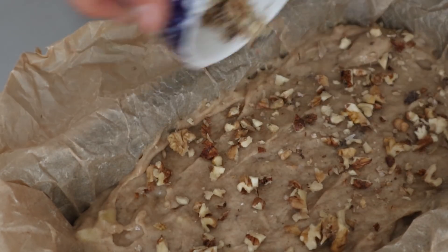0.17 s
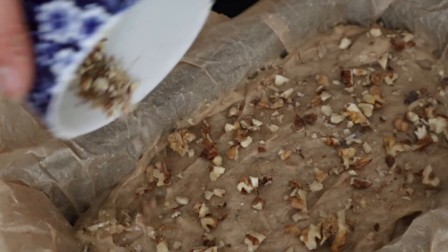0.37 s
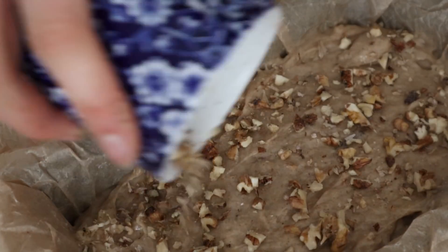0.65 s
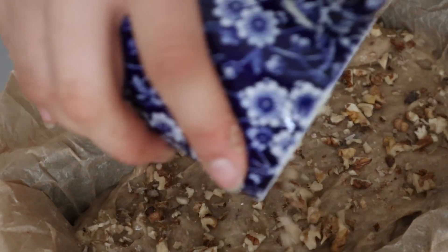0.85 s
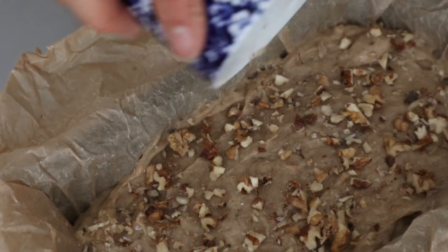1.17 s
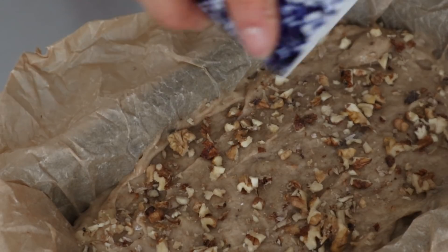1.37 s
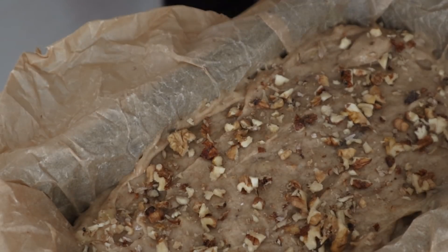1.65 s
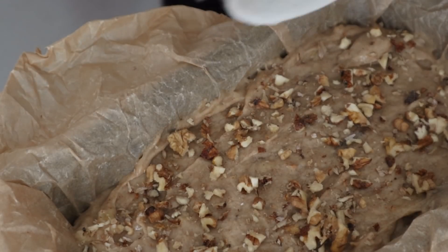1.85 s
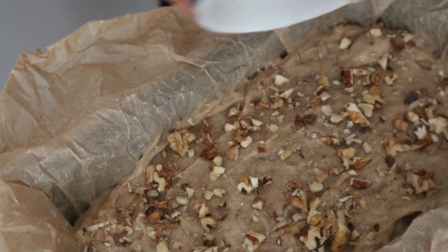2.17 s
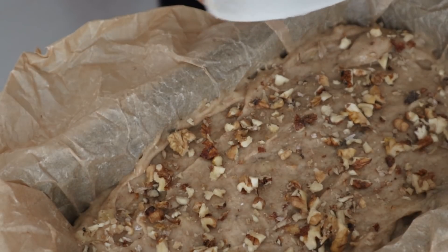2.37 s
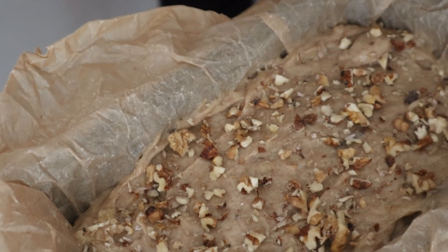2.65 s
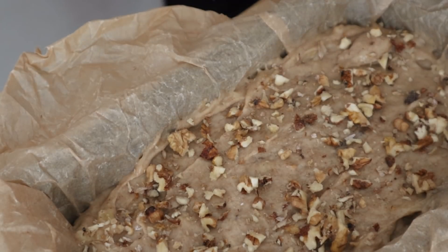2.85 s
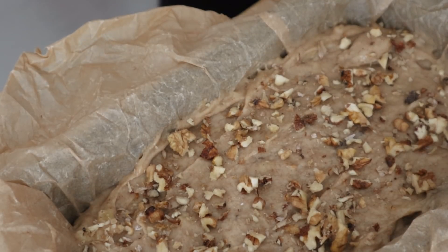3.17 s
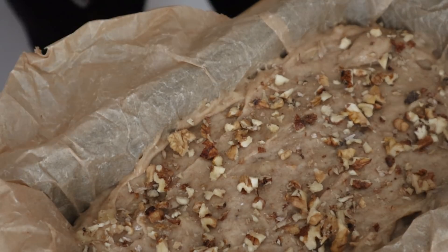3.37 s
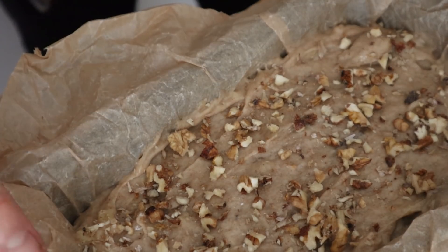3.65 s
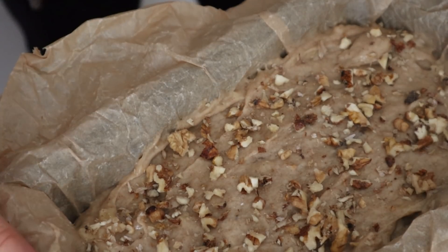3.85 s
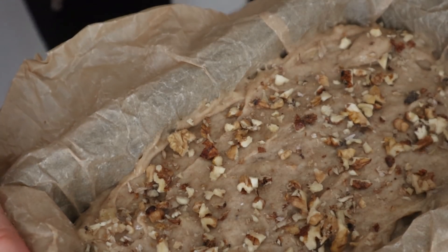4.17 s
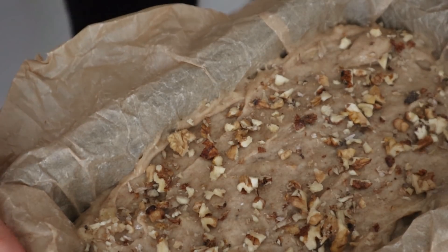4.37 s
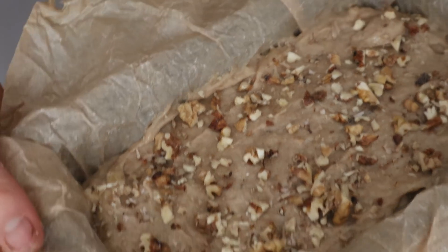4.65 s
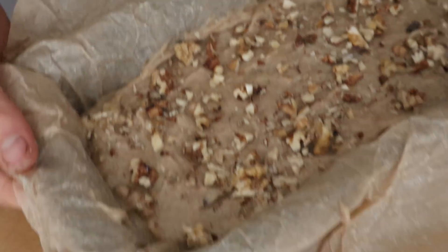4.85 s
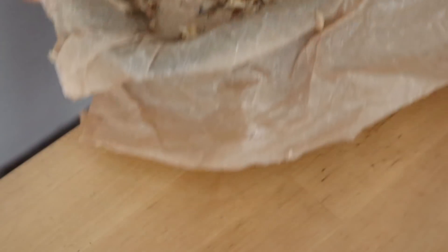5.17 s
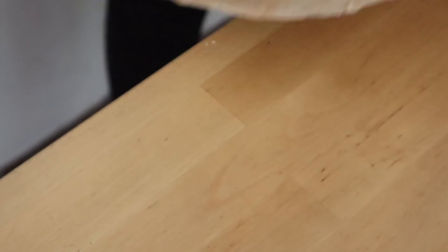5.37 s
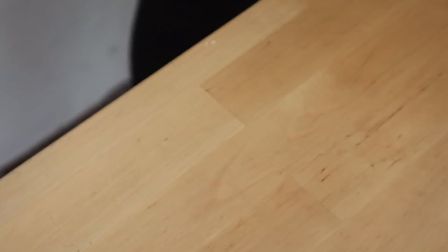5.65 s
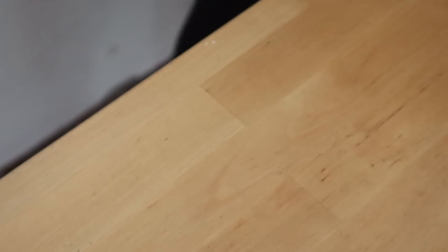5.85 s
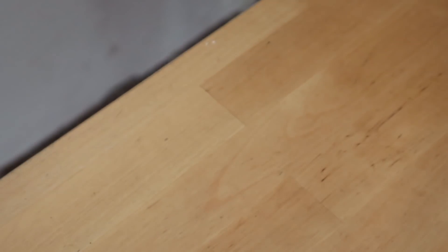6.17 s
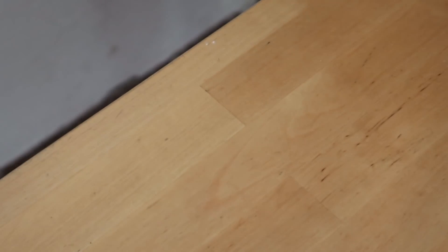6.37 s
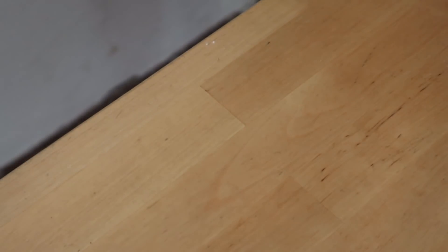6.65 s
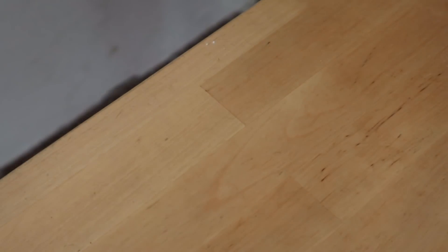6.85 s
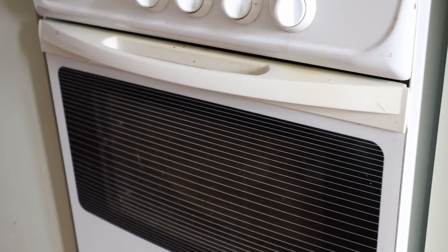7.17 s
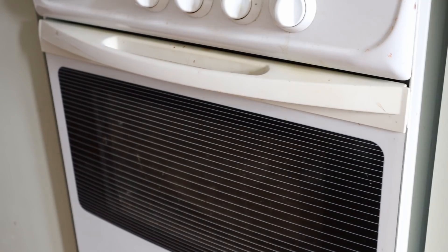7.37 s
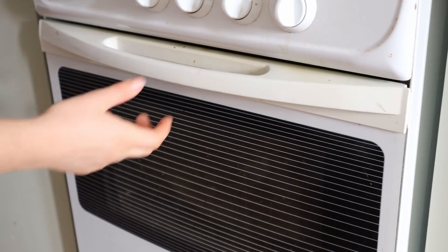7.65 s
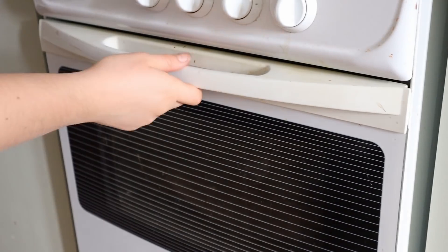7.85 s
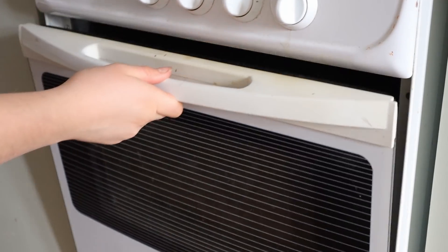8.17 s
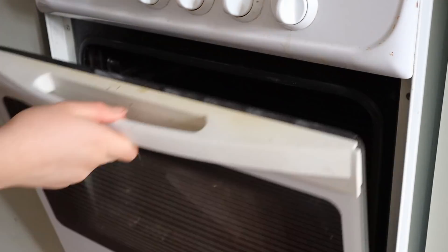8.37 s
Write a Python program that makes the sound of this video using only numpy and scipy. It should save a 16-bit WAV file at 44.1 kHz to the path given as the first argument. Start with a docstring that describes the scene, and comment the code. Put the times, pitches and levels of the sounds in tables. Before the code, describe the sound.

A close stereo microphone catches small dry clicks of falling nuts and bright ceramic knocks, the last one loudest. Quiet follows, then dense baking-paper crinkles and snaps, low thumps on a wooden worktop, a short stick-slip squeak and a few clicks. After a lull, a hand brushes the handle and the oven door opens with grating and panel boom. The kitchen has a short, hard echo.

```python
"""Nuts shaken from a china bowl

Chopped nuts fall over batter in a paper-lined tin; the bowl, a bank of damped modes, is tapped empty.
Hands gather the paper (grains, noise bursts), slide and lift the tin off a wooden worktop (squeak, thuds),
and an oven door is pulled open in jerks (grating hinge, panel resonances).
A small hard kitchen adds decaying-noise tails and steady air, through two close ports, widened."""
import sys
import numpy as np
from scipy import signal
from scipy.fft import rfft, irfft
from scipy.io import wavfile

SR = 44100
rng = np.random.default_rng(int(sys.argv[2]) if len(sys.argv) > 2 else 0)


def generate_wav(signal):
    """Clip the signal to [-1, 1] and save it as 16-bit WAV at the path in sys.argv[1]."""
    frames = np.transpose(np.atleast_2d(signal))
    scaled = np.clip(frames, -1, 1) * 32767
    pcm = np.round(scaled).astype(np.int16)
    wavfile.write(sys.argv[1], SR, pcm)


N = 375278


def amp(db):
    """Decibels to gain."""
    return 10 ** (np.asarray(db) / 20)


def rms_one(x):
    """Scale to unit rms."""
    return x / np.sqrt(np.mean(x ** 2) + 1e-20)


def in_time(rows, outside=-120.):
    """Interpolate each column sample by sample; `outside` beyond the span."""
    s, *columns = np.transpose(rows)
    return np.array([np.interp(np.arange(N) / SR, s, c, outside, outside) for c in columns])


def at_hz(points, hz):
    """Table value on a log-frequency axis."""
    table = np.array(points)
    return np.interp(np.log(hz + 1), np.log(table[:, 0]), table[:, 1])


def shaped(x, spectrum):
    """Colour a signal by a spectrum; rms 1."""
    gain = amp(at_hz(spectrum, np.fft.rfftfreq(N, 1 / SR)))
    return rms_one(irfft(rfft(x) * gain, N))


def band_pass(x, edges_hz):
    """Second-order Butterworth band."""
    return signal.sosfilt(signal.butter(2, edges_hz, "band", fs=SR, output="sos"), x)


def resonance(x, hz, width_hz):
    """Two-pole peak with gain 1 on top."""
    r = np.exp(-np.pi * width_hz / SR)
    poles = [1, -2 * r * np.cos(2 * np.pi * hz / SR), r * r]
    return signal.lfilter([(1 - r * r) / 2, 0, (r * r - 1) / 2], poles, x)


def ring(force, hz, t60_s):
    """Damped mode: a unit click starts a sine of height 1."""
    r, w = amp(-60 / (t60_s * SR)), 2 * np.pi * hz / SR
    return signal.lfilter([0, np.sin(w)], [1, -2 * r * np.cos(w), r * r], force + 1e-18)


def drift(cutoff_hz):
    """Low-passed noise, rms 1."""
    low_pass = signal.butter(2, cutoff_hz, fs=SR, output="sos")
    return rms_one(signal.sosfilt(low_pass, rng.standard_normal(N)))


def grains(per_s, spread_db):
    """Noise with random ticks of very uneven size; rms 1."""
    sizes = amp(spread_db * np.minimum(rng.exponential(1, N), 4))
    ticks = (rng.random(N) < per_s / SR) * sizes
    envelope = signal.lfilter([1], [1, -.93], ticks + 0.14)
    return rms_one(envelope * rng.standard_normal(N))


SWELL_DROP_DB = 20   # lost over the swell and over the fade


def swells(peak_s, level_db, swell_s, fade_s):
    """Gain of events rising and falling straight in decibels; powers add."""
    t, power = np.arange(N) / SR, 0
    for at, db, up, down in np.broadcast(peak_s, level_db, swell_s, fade_s):
        distance = np.maximum((at - t) / max(up, .002), (t - at) / max(down, .002))
        power = power + amp(2 * (db - SWELL_DROP_DB * distance))
    return np.sqrt(power)


EDGE_T60_S = 0.009


def burst(centre_hz, treble_db, t60_s, share=0.39, edge_hz=None):
    """A crack: dying noise in a steep-sided resonance plus a short bright edge; peak 1."""
    t = np.arange(3000) / SR
    onset = np.minimum(t / .0003, 1)
    noise = rng.standard_normal((2, len(t))) * amp(-60 * t / [[t60_s], [EDGE_T60_S]]) * onset
    body = resonance(noise[0], centre_hz, share * centre_hz)
    body = resonance(body, centre_hz, 1.37 * centre_hz)
    edge = band_pass(noise[1], edge_hz or [rng.uniform(2000, 5000), 11000])
    both = rms_one(body) + amp(treble_db) * rms_one(edge)
    return both / np.abs(both).max()


def add(out, s, sound):
    """Mix a short sound in at a time."""
    i = round(s * SR)
    out[i:i + len(sound)] += sound[:N - i]


# bowl struck: start_s, peak_db, ring_over_peak_db, crack_treble_over_body_db, rim_mode_offset_db
BOWL_TAPS = [(0.386, -60.5, 10, -20, 0), (0.767, -66.5, 14, 6, -4), (0.8079, -40.5, -4.5, 13, 18),
             (1.869, -14, -10.5, -8.5, -3), (2.087, -19.5, -13, -10, 11.5), (2.3086, -12, -10, -12, -10),
             (2.529, -1, -18, 1.5, 2)]
# china bowl modes: pitch_hz, level_db, t60_s
BOWL_MODES = [(1911, 6, 0.032), (1910, -22, 0.38), (2302, 5.5, 0.033), (2310, -29, 0.43),
              (4584, -10.5, 0.047), (572, -10, 0.06), (6100, -8, 0.022), (6820, -5, 0.026),
              (8900, -11, 0.023), (10020, -4, 0.024), (10870, 3, 0.03), (11150, -6, 0.02)]
# loose nuts slide over the china: peak_s
SHAKES = [0.07, 0.2, 0.37, 0.75]
SLIDING_WIDTH_HZ, SLIDING_DB, SLIDING_SWELL_S = 38, -65.5, 0.076
RIM_MODE = 4   # row that depends most on where the bowl is struck
SLIDING_MODES = (1, 3, RIM_MODE, 6, 10)   # rows excited by sliding nuts


def bowl():
    """Taps crack and strike each mode with its own strength; most modes die fast under the holding hand."""
    out, taps = np.zeros(N), np.array(BOWL_TAPS)
    at = (taps[:, 0] * SR).astype(int)
    for s, peak_db, _, treble_db, _ in BOWL_TAPS:
        knock = burst(730, treble_db, 0.0096, share=1.0, edge_hz=[3000, 7500])   # short, broad knock
        add(out, s, amp(peak_db) * knock)
    shaken = swells(SHAKES, SLIDING_DB, SLIDING_SWELL_S, SLIDING_SWELL_S)
    for k, (hz, level_db, t60_s) in enumerate(BOWL_MODES):
        if k in SLIDING_MODES:
            out += shaken * rms_one(resonance(rng.standard_normal(N), hz, SLIDING_WIDTH_HZ))
        strike_db = taps[:, 1] + taps[:, 2] + level_db + rng.normal(0, 2, len(at))
        if k == RIM_MODE:
            strike_db = strike_db + taps[:, 4]
        force = np.zeros(N)
        force[at] = amp(strike_db)
        out += ring(force, hz, t60_s)
    return out


# snaps of nuts, paper, tin and oven door: start_s, peak_db, centre_hz, treble_over_body_db
SNAP_EVENTS = [(0.117, -18, 1330, -27), (0.124, -28, 1310, 12), (0.158, -23.5, 1190, -4.5),
               (0.168, -30, 3460, -9), (0.436, -33.5, 1200, -18), (0.452, -29, 7140, -12),
               (0.465, -19.5, 2660, -1), (0.6, -23, 4640, 5), (0.609, -19, 2680, 0), (0.953, -12, 4600, -5),
               (0.926, -29, 3430, -11), (0.972, -18.5, 1110, -1), (1.118, -17.5, 3320, -20),
               (1.166, -26.5, 1400, -4.5), (1.213, -30, 1600, -1.5), (1.903, -22, 9000, -22),
               (2.146, -34, 9000, -2), (2.38, -27, 1880, -2), (2.48, -34.5, 8100, 2), (2.499, -36, 6000, 2),
               (2.988, -36, 1210, 4), (3.608, -21, 810, -23), (3.779, -25, 2900, -9),
               (3.891, -11.5, 5500, -5), (3.931, -8.5, 3370, -7), (3.944, -6.5, 5500, -4),
               (3.949, -19, 6000, 5), (3.987, -16.5, 1230, -2), (4.003, -7, 950, 0.5),
               (4.012, -11.5, 1130, -21), (4.031, -16, 1440, 17), (4.06, -18.5, 1040, -26),
               (4.083, -15, 4000, 17), (4.092, -6.5, 3720, 2), (4.161, -17, 1110, -15),
               (4.165, -8, 1110, -13.5), (4.175, -8, 1140, -9), (4.224, -20, 1190, -6),
               (4.266, -27, 2500, 11), (4.438, -14.5, 3230, -33), (4.478, -11, 2930, -14),
               (4.522, -14, 3060, -24), (4.611, -19.5, 3800, -22), (4.638, -24, 1770, 9),
               (4.742, -21, 2120, -12), (4.868, -33.5, 6000, 17), (4.931, -29, 3480, 5),
               (5.016, -35, 3450, -7.5), (5.16, -13.5, 1270, -1.5), (5.602, -12.5, 2780, -15),
               (5.607, -18.5, 577, -6.5), (5.933, -19.5, 2040, -7), (5.947, -19, 2220, -15),
               (5.959, -14.5, 2050, -12), (5.986, -21, 1950, -20), (6.075, -23.5, 1900, -6),
               (6.326, -20.5, 3420, -1), (6.531, -12, 5900, 1.5), (6.84, -34, 3970, -2),
               (7.693, -30, 4740, -16), (8.2, -27, 2460, -30), (8.244, -29, 4600, -17),
               (8.357, -22.5, 4300, 1)]
SNAP_CYCLES, SNAP_S = 19, 0.0045   # body t60: this many cycles plus this time


def snaps():
    """Single cracks, each with its own colour; low ones last longer."""
    out = np.zeros(N)
    for s, peak_db, hz, treble_db in SNAP_EVENTS:
        add(out, s, amp(peak_db) * burst(hz, treble_db, SNAP_S + SNAP_CYCLES / hz))
    return out


# hands gathering the paper: time_s, creasing_level_db
GATHERING = [(3.596, -31.5), (3.612, -36.5), (3.72, -38), (3.86, -36), (4.05, -41.5), (4.2, -35),
             (4.34, -39.5), (4.47, -40.5), (4.72, -46.5), (4.81, -56.5)]
GATHER_TREBLE_DB = 0.5   # bright paper over tin body
# rustles of nuts on paper, tin on wood, hand on handle:
# peak_s, level_db, swell_s, fade_s, treble_over_body_db, panel_over_body_db
RUSTLES = [(0.959, -32.5, 0.012, 0.063, 3, -35), (5.168, -40.5, 0.028, 0.24, -6, -33),
           (5.745, -36.5, 0.15, 0.13, 4.5, -3), (6.001, -31, 0.12, 0.054, 2, -3),
           (6.19, -45, 0.29, 0.16, 0.5, -36), (6.388, -43.5, 0.13, 0.097, 1, -29),
           (6.552, -43, 0.17, 0.099, 1.5, -27), (7.25, -52.5, 0.074, 0.16, 2, -33),
           (7.599, -47.5, 0.066, 0.14, 6.5, -13), (7.705, -52.5, 0.028, 0.088, 7, -30)]
# oven door gives in jerks: peak_s, scrape_db, panel_ring_db, deep_boom_db
DOOR_JERKS = [(8.045, -45, -60, -52), (8.088, -46, -41, -40.5), (8.131, -42, -45, -38),
              (8.182, -40, -48, -56), (8.249, -39.5, -31, -36), (8.342, -49, -53, -50),
              (8.362, -38, -32, -23), (8.41, -49, -31.5, -30), (8.495, -43, -30, -28)]
JERK_SWELL_S, SCRAPE_FADE_S, GRIT_FADE_S, GRIT_DB = 0.02, 0.076, 0.13, -8
RING_LAG_S, RING_FADE_S, BOOM_LAG_S, BOOM_FADE_S = 0.0088, 0.11, 0.038, 0.069


def efforts():
    """Hand and door motion as gains of tin body, bright paper, panel ring and deep boom."""
    gather = amp(in_time(GATHERING)[0])
    s, db, swell, fade, treble, panel_over = np.transpose(RUSTLES)
    at, scrape, panel, deep = np.transpose(DOOR_JERKS)
    body = gather + swells(s, db, swell, fade)
    body = body + swells(at, scrape, JERK_SWELL_S, SCRAPE_FADE_S)
    bright = gather * amp(GATHER_TREBLE_DB) + swells(s, db + treble, swell, fade)
    bright = bright + swells(at, scrape + GRIT_DB, JERK_SWELL_S, GRIT_FADE_S)
    mid = swells(s, db + panel_over, swell, fade)
    mid = mid + swells(at + RING_LAG_S, panel, JERK_SWELL_S + RING_LAG_S, RING_FADE_S)
    low = swells(at + BOOM_LAG_S, deep, JERK_SWELL_S + BOOM_LAG_S, BOOM_FADE_S)
    return body, bright, mid, low


# tin body resonances: centre_hz, width_hz, level_db
TIN_BODY = [(324, 437, 17.5), (708, 640, 18), (1060, 1470, 17.5)]
# paper colouring: frequency_hz, gain_db
PAPER_SPECTRUM = [(1300, -51), (2300, -7.5), (3700, -5.5), (6900, -11.5), (10500, -12), (12500, -19.5)]


def rustle(body_gain, treble_gain):
    """Dense creases excite tin and paper; each part of the sheet crackles in its own patches."""
    creases = grains(900, 2.8) * amp(1.8 * drift(28.0))
    tin = 0
    for hz, width_hz, db in TIN_BODY:
        part = resonance(resonance(creases, hz, width_hz), hz, 2 * width_hz)
        tin = tin + amp(db + 2.8 * drift(23.5)) * part
    paper = 0
    for hz in np.geomspace(2500, 11000, 5):
        crinkles = (rng.random(N) < 40 / SR) * rng.standard_normal(N)   # lone, sharp; 40 per s in each band
        crinkles = 5.6 * signal.lfilter([1], [1, -.97], crinkles) * rng.standard_normal(N)
        patches = amp(5.5 * drift(13.2)) * creases
        paper = paper + resonance(patches + crinkles, hz, 0.5 * hz)
    return body_gain * rms_one(tin) + treble_gain * shaped(paper, PAPER_SPECTRUM)


# stick-slip of the tin's edge, a faint slide then a squeak; each: time_s, pitch_hz, level_db
SQUEAK_GLIDES = [
    [(5.2, 1550, -63.5), (5.595, 1303, -50.5)],
    [(5.88, 2382, -55), (5.95, 2043, -26), (6.02, 1850, -35.5), (6.09, 1762, -49.5), (6.18, 1818, -39.5),
     (6.3, 1805, -55)],
]
PARTNER_FROM_S, PARTNER_RATIO = 6.12, 1.46


def squeak():
    """Stick-slip as gliding tones roughened by slow noise; a higher partner joins late."""
    out, late = 0, np.clip((np.arange(N) / SR - PARTNER_FROM_S) * 20, 0, 1)
    wobble = [drift(190), drift(190)]
    for rows in SQUEAK_GLIDES:
        hz, db = in_time(rows)
        phase = 2 * np.pi * np.cumsum(np.maximum(hz, 0)) / SR
        main = wobble[0] * np.cos(phase)
        partner = 0.95 * late * wobble[1] * np.cos(PARTNER_RATIO * phase)
        out = out + amp(db + 2 * drift(38)) * (main + partner)
    return out


# thuds into the worktop: start_s, push_db, contact_s
WORKTOP_THUDS = [(1.867, -39.5, 0.0036), (4.171, -38.5, 0.0011), (4.266, -38.5, 0.0018),
                 (4.689, -29, 0.0053), (5.605, -31, 0.0016), (5.896, -24.5, 0.009), (6.339, -31.5, 0.0075)]
# wooden board modes: pitch_hz, level_db, t60_s
WORKTOP_MODES = [(124.7, -6, 1), (228, 12.5, 0.037), (570, -4, 0.26)]
DAMPED_AFTER_S, DAMPING_S = 0.073, 0.028   # then weight on the board stills it


def worktop():
    """Smooth pushes ring the board; a long contact reaches only its lowest mode."""
    board, t = np.zeros(N), np.arange(SR // 2) / SR
    stilled = np.exp(-np.maximum(t - DAMPED_AFTER_S, 0) / DAMPING_S)
    for s, push_db, contact_s in WORKTOP_THUDS:
        push = np.hanning(max(int(contact_s * SR), 20))
        force = np.pad(amp(push_db) * push / push.sum(), (0, len(t) - len(push)))
        modes = sum(amp(db) * ring(force, hz, t60_s) for hz, db, t60_s in WORKTOP_MODES)
        add(board, s, stilled * modes)
    # a board radiates no slow push
    return signal.sosfilt(signal.butter(4, 90, "high", fs=SR, output="sos"), board)


# thin panel modes: centre_hz, width_hz, level_db
PANEL_MODES = [(120, 22, -11), (181, 94, -3.5), (432, 52, 2), (633, 34, -5)]


def rumble(mid_gain, low_gain):
    """Grainy noise shakes thin panels into their modes; ring and boom are split by band."""
    shake = grains(900, 2.0)
    panels = 0.55 * shake
    for hz, width_hz, db in PANEL_MODES:
        panels = panels + amp(db) * resonance(shake, hz, width_hz)
    boom = rms_one(band_pass(panels, [70, 250]))
    panel_ring = rms_one(band_pass(panels, [250, 900]))
    return low_gain * boom + mid_gain * panel_ring


HINGE_HZ, HINGE_WIDTH_HZ, HINGE_DB = 2500, 800, -2   # level over the scrape
HINGE_UPPER_HZ = 4600   # thinner second ring


def hinge():
    """The hinge grates in coarse resonated grains at every jerk of the door."""
    at, scrape = np.transpose(DOOR_JERKS)[:2]
    grit = grains(150, 5.5)
    main = resonance(resonance(grit, HINGE_HZ, HINGE_WIDTH_HZ), HINGE_HZ, 2 * HINGE_WIDTH_HZ)
    upper = 0.52 * resonance(grit, HINGE_UPPER_HZ, HINGE_WIDTH_HZ / 2)
    return swells(at, scrape + HINGE_DB, JERK_SWELL_S, SCRAPE_FADE_S) * rms_one(main + upper)


# soft footfalls: peak_s, level_db, spread_s
FOOTFALLS = [(3.17, -46.5, 0.063), (3.83, -52, 0.2)]
FLOOR_HZ, FLOOR_WIDTH_HZ = 59.6, 42


def steps():
    """Weight shifting on the floor swells its low resonance."""
    t = np.arange(N) / SR
    swell = sum(amp(db) * np.exp(-((t - s) / spread_s) ** 2) for s, db, spread_s in FOOTFALLS)
    boom = resonance(rng.standard_normal(N), FLOOR_HZ, FLOOR_WIDTH_HZ)
    return swell * rms_one(resonance(boom, FLOOR_HZ, 2 * FLOOR_WIDTH_HZ))


# room decay: frequency_hz, t60_s
KITCHEN_DECAY = [(125, 0.46), (500, 0.52), (2000, 0.32), (6000, 0.31), (12000, 0.17)]
KITCHEN_DB, KITCHEN_SIDE_DB = -10.5, 5   # tail level; further gain of its side part


def kitchen(x):
    """Centre and side reverberation: noise dying at the rate of each octave."""
    t, tail = np.arange(SR // 2) / SR, 0
    for low_hz in 60 * 2. ** np.arange(8):
        dying = amp(-60 * t / at_hz(KITCHEN_DECAY, 1.4 * low_hz))
        tail = tail + band_pass(rng.standard_normal((2, len(t))), [low_hz, 2 * low_hz]) * dying
    tail = tail * np.clip((t - .003) / 0.00021, 0, 1)   # first walls answer after 3 ms
    tail = tail / np.sqrt(np.sum(tail[0] ** 2))
    return signal.fftconvolve(x[None], tail, axes=1)[:, :N] * amp(KITCHEN_DB)


# stereo width: frequency_hz, side_over_centre_db
PORT_WIDTH = [(60, -61), (300, -16), (1100, -7.5), (2500, 1), (6600, 3), (12000, 9)]


def between_ports(x, turn_rad):
    """The difference of two near ports grows with pitch and runs about a quarter cycle ahead."""
    hz = np.fft.rfftfreq(N, 1 / SR)
    lead_rad = np.pi / 2 + turn_rad * np.exp(-np.log((hz + 1) / 1300) ** 2 / 1.2)
    return irfft(rfft(x) * amp(at_hz(PORT_WIDTH, hz)) * np.exp(1j * lead_rad), N)


# steady room noise, centre then sides: frequency_hz, relative_level_db
AIR_CENTRE = [(20, -1.5), (128, -2.5), (1940, -15.5), (3240, -19), (7670, -28.5), (10600, -26),
              (12500, -33)]
AIR_SIDES = [(20, -19), (170, 3.5), (500, 3.5), (1940, -2.5), (4600, -9.5), (8100, -16), (10300, -14.5),
             (12500, -16)]
AIR_DB, AIR_SIDE_DB = -52.5, -49.5


def air():
    """Steady room air: coloured noise, independent in centre and sides."""
    centre = amp(AIR_DB) * shaped(rng.standard_normal(N), AIR_CENTRE)
    sides = amp(AIR_SIDE_DB) * shaped(rng.standard_normal(N), AIR_SIDES)
    return centre, sides


# where the hands are: time_s, lean (-1 right to 1 left)
HAND_POSITIONS = [(0, -.75), (3.2, -.75), (3.6, .6), (5.0, .6), (5.4, -.75), (6.8, -.75), (7.1, .5),
                  (8.51, .5)]


def scene():
    """Near sounds, their room tail and the steady air, as left and right."""
    body, treble, ring_gain, boom_gain = efforts()
    near = bowl() + snaps() + rustle(body, treble) + squeak() + worktop()
    near = near + rumble(ring_gain, boom_gain) + hinge() + steps()
    lean = in_time(HAND_POSITIONS, 0)[0]
    wet = kitchen(near)
    air_centre, air_sides = air()
    mid = near + wet[0] + air_centre
    side = between_ports(lean * near + amp(KITCHEN_SIDE_DB) * wet[1], turn_rad=-0.9)
    side = side + air_sides
    return np.array([mid + side, mid - side])


CUTOFF_HZ = 16000


def record(dry, order=6):
    """The sound is dull above 12 kHz and stops near 16 kHz; peaks clip."""
    soft = signal.sosfilt(signal.butter(order, 12000, fs=SR, output="sos"), dry)
    low_pass = signal.cheby2(12, 70, CUTOFF_HZ, fs=SR, output="sos")
    return signal.sosfilt(low_pass, np.clip(soft, -1, 1))


dry = scene()
out = record(dry)
generate_wav(out)
```